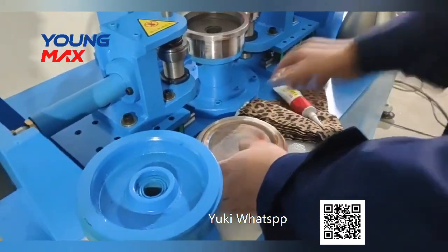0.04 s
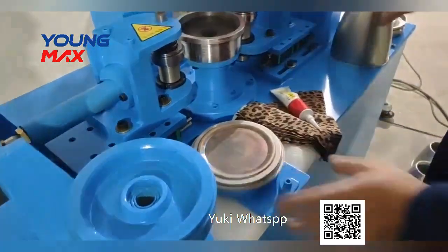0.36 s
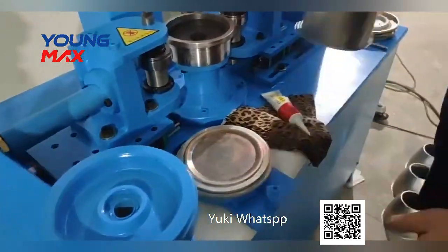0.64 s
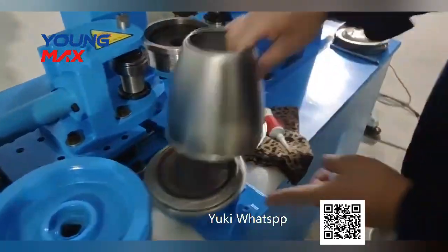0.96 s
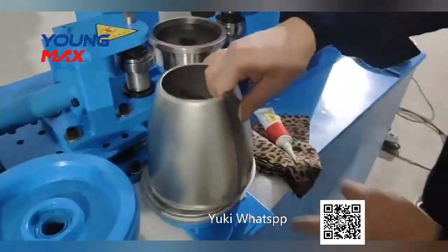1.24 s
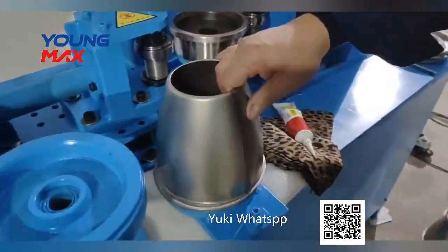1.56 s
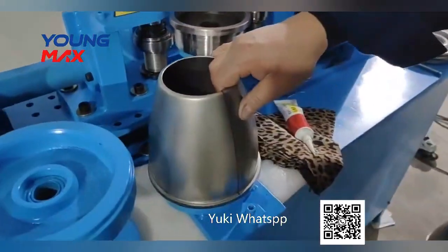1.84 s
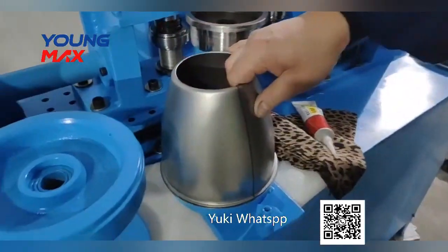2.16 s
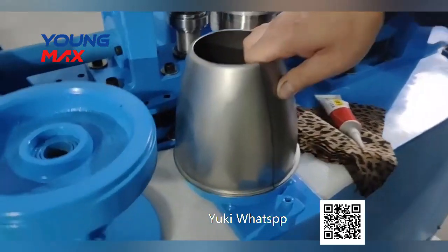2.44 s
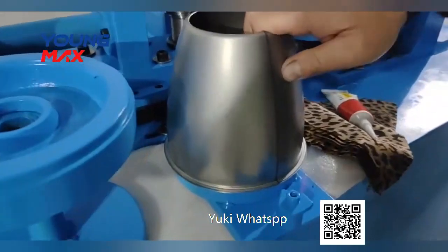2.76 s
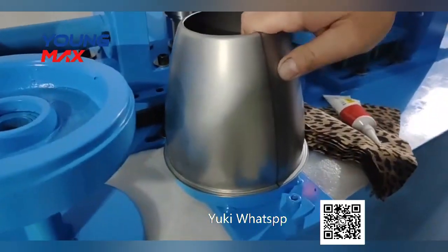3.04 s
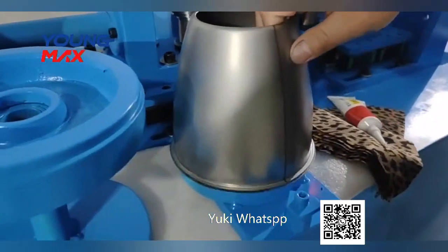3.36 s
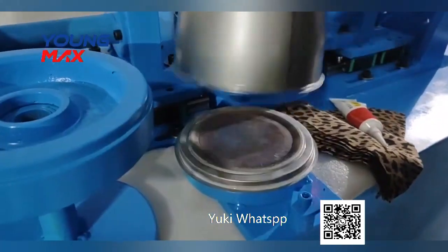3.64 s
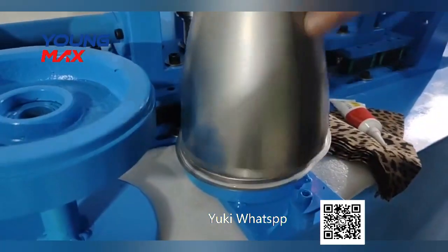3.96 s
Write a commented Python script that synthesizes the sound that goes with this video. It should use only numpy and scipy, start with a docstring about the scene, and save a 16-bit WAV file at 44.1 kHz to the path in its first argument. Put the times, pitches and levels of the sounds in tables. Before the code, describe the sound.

An idling machine motor hums, whirs and throbs in a workshop, growing slightly louder as the microphone moves closer. Handled steel parts knock and clack brightly near the start, then slide, tick and knock softly against a metal plate.

```python
"""A motor hums and throbs, its bearings whirring once per turn: a metalworking machine idling in a workshop.
A steel kettle body is picked from a stack with a ringing double clack, set on its base plate with a few
dull knocks and lifted off again; its thin rim slides and ticks. Shaft harmonics beat to make the throb,
and swell and fade over the fan's rush as the microphone drifts closer to the motor."""
import sys
import numpy as np
from scipy import signal
from scipy.fft import rfft, irfft
from scipy.io import wavfile

SR = 44100
rng = np.random.default_rng(int(sys.argv[2]) if len(sys.argv) > 2 else 0)


def digitize_waveform(pressure):
    """Quantize a signal to 16-bit integers and store it at the path in sys.argv[1].

    Rows of a 2-D input are taken as channels; values are limited to [-1, 1].
    """
    field = np.atleast_2d(pressure).T
    bounded = np.clip(field, -1, 1)
    quanta = np.round(bounded * 32767).astype(np.int16)
    wavfile.write(sys.argv[1], SR, quanta)


N = 176400
T = np.arange(N) / SR
SHAFT_HZ, CUTOFF_HZ = 24.823, 12100


def from_db(db):
    """Decibels to gain."""
    return 10 ** (np.asarray(db) / 20)


def in_time(rows):
    """Rows of (time_s, value), interpolated per sample."""
    return np.interp(T, *np.transpose(rows))


def at_hz(points, hz):
    """Spectrum level in dB, interpolated over log frequency."""
    points_hz, db = np.transpose(points)
    return np.interp(np.log(np.maximum(hz, 1)), np.log(points_hz), db)


def drift(rate_hz):
    """Random wander of spread 1, low-passed at rate_hz."""
    hop, settle = 100, 2000
    pole = np.exp(-2 * np.pi * rate_hz * hop / SR)
    noise = rng.standard_normal(N // hop + settle + 2)
    slow = signal.lfilter([1], [1, -2 * pole, pole * pole], noise)[settle:]
    return np.interp(np.arange(N) / hop, np.arange(len(slow)), (slow - slow.mean()) / slow.std())


def band_noise(low_hz, high_hz):
    """Band-passed noise, rms 1."""
    band = signal.butter(2, [low_hz, high_hz], "band", fs=SR, output="sos")
    noise = signal.sosfilt(band, rng.standard_normal(N))
    return noise / noise.std()


def highpass(x, hz):
    """Second-order low cut."""
    return signal.sosfilt(signal.butter(2, hz, "high", fs=SR, output="sos"), x)


def ring(clicks, hz, t60_s):
    """One mode: a unit click starts a decaying sine of height 1."""
    pole = np.exp(-np.log(1000) / (t60_s * SR))
    step_rad = 2 * np.pi * hz / SR
    return signal.lfilter([0, np.sin(step_rad)], [1, -2 * pole * np.cos(step_rad), pole ** 2],
                          clicks + 1e-18)


def clicks_at(times_s, gains):
    """Single-sample blows."""
    out = np.zeros(N)
    np.add.at(out, (np.atleast_1d(times_s) * SR).astype(int), gains)
    return out


def dying(start_s, decay_s):
    """Sudden start, exponential decay."""
    return (T >= start_s) * np.exp(-np.minimum(np.abs(T - start_s) / decay_s, 60))


def hum(turns, near_db):
    """Shaft harmonics and mains hum; the 25th and 26th harmonics beat into a throb."""
    # strong harmonics along the microphone's path: time_s, level_db
    hum_13 = [(0, -66), (.6, -62), (.9, -54), (1.15, -47), (1.7, -44), (2.1, -43), (2.6, -45.5), (3.1, -47),
              (3.5, -53), (4, -56)]
    hum_25 = [(0, -50), (.4, -48.5), (.8, -50), (1.3, -51), (1.7, -56), (2.2, -57), (2.5, -47),
              (2.9, -41.3), (3.3, -41.5), (4, -41.5)]
    hum_26 = [(0, -56), (.5, -61), (.8, -46), (1.2, -47), (2.1, -39.5), (2.6, -39.8), (3, -38.5),
              (3.4, -39.3), (4, -39.3)]
    hum_65 = [(0, -64), (1.8, -65), (2.5, -57), (3.2, -55.5), (4, -54.5)]
    # weaker tones and whines: shaft_multiple (rounded below), level_db, peak_s, fade_db_per_s
    whines = [(8, -54.5, 4.5, 3.5), (10, -56.5, 3.5, 5), (15, -56, -0.5, 4.5), (16, -55, 4.5, 5.5),
              (23, -59, 2.5, 5), (24, -46.5, -0.5, 11), (27, -53, -0.5, 8.5), (31, -67, 2, 2.5),
              (34, -57.5, 3.5, 2.5), (36, -52.5, 2, 5), (37, -59.5, 1, 3.5), (39, -53.5, 2.5, 4),
              (40, -60, 3, 4), (49, -59, 2.4, 3.5), (52, -62, 3.5, 3.5), (72.5, -60, 3, 4),
              (84.7, -55, 0.5, 6), (85.6, -58.5, 4, 3), (91, -60, 2, 3), (131.8, -58, 1.5, 10.5),
              (141.7, -58, 2, 15), (154, -52, 1.3, 12), (156.5, -67, 6, 12), (156, -57.5, 3.5, 2),
              (159, -54, 3.3, 5), (166, -59, 2, 8), (207, -64, 2.8, 1)]
    # electrical hum of the windings: pitch_hz, level_db, peak_s, fade_db_per_s
    mains = [(100.3, -56, 1.4, 0.5), (199.8, -52, 2.23, 5), (299.6, -48, 2.2, 4)]

    def tone(cycles, rms_db):
        return np.sqrt(2) * from_db(rms_db) * np.sin(2 * np.pi * cycles)

    def passing(cycles, level_db, peak_s, fade_db_per_s):
        """A tone loudest near one spot on the path."""
        place_db = 0.95 * near_db - fade_db_per_s * np.abs(T - peak_s)
        phase = rng.random()
        wander_db = 2.5 * drift(rate_hz=0.94)
        return tone(cycles + phase, level_db + place_db + wander_db)

    out = np.zeros(N)
    for multiple, curve in [(13, hum_13), (25, hum_25), (26, hum_26), (65, hum_65)]:
        out += tone(multiple * turns, in_time(curve) + 0.63 * drift(rate_hz=7.2))
    uneven_turns = turns + 0.0006 * drift(rate_hz=14)  # blurs the high whines
    out += sum(passing(np.round(multiple) * uneven_turns, *place) for multiple, *place in whines)
    return out + sum(passing(hz * T, *place) for hz, *place in mains)


def bearing_whir(turns, size=16384):
    """A rough track run over once per turn; its sound shifts with the listening position."""
    # whir spectrum: frequency_hz, density_db
    spectrum = [(400, -89), (800, -79.5), (1400, -109), (1900, -83.5), (2750, -95), (3300, -88),
                (4000, -86), (4600, -87.5), (5600, -83.5), (7000, -91.5), (7900, -78.5), (9500, -91),
                (12000, -84)]
    hz = np.arange(size // 2 + 1) * SHAFT_HZ
    in_band = (hz > 0) & (hz < CUTOFF_HZ)
    height = from_db(at_hz(spectrum, hz)) * np.sqrt(SHAFT_HZ) * size / 2 * in_band

    def track():
        one_turn = irfft(height * (rng.standard_normal(len(hz)) + 1j * rng.standard_normal(len(hz))))
        return np.interp(turns * size, np.arange(size), one_turn, period=size)

    crossfade_rad = np.pi / 2 * T / T[-1]
    return track() * np.cos(crossfade_rad) + track() * np.sin(crossfade_rad)


def fan_air():
    """Rush of the cooling fan over shop rumble, flickering slightly."""
    # air and rumble spectrum: frequency_hz, density_db
    spectrum = [(20, -92), (32, -81), (52, -69), (100, -69), (150, -71.5), (225, -72), (265, -75),
                (340, -70), (430, -77.5), (620, -74.5), (900, -81), (1150, -82.5), (1500, -82.5),
                (2000, -80), (2750, -86.5), (3500, -84), (3980, -82.5), (4500, -85.5), (5800, -87),
                (7000, -77), (7900, -79.5), (9500, -86), (10800, -91.5), (12000, -81.5)]
    hz = np.arange(N // 2 + 1) * SR / N
    height = from_db(at_hz(spectrum, hz)) * np.sqrt(SR / 2)
    rush = irfft(rfft(rng.standard_normal(N)) * height, N)
    flicker_db = 1.72 * drift(rate_hz=20.5)
    return rush * from_db(flicker_db)


def rim():
    """The thin rim slides in short grainy strokes and ticks when touched."""
    # metal sliding on metal: start_s, level_db, length_s, low_hz, high_hz
    slides = [(0, -38.5, 0.038, 566, 1110), (0, -42, 0.093, 1800, 5070), (0.022, -44.5, 0.099, 930, 1050),
              (0.724, -42, 0.12, 1100, 2980), (1.503, -50, 0.16, 1100, 2360), (1.49, -42, 0.067, 487, 920),
              (1.629, -46, 0.073, 650, 1040), (1.733, -44.5, 0.027, 800, 1080),
              (1.821, -43, .018, 900, 2400), (3.238, -43, 0.11, 1500, 10900),
              (3.934, -43, 0.052, 2800, 5700)]
    # light touches: start_s, level_db
    ticks = [(1.825, -39), (2.259, -41), (3.933, -30.5)]
    tick_envelope = sum(from_db(level_db) * dying(start_s, decay_s=0.016) for start_s, level_db in ticks)
    out = band_noise(7500, CUTOFF_HZ) * tick_envelope
    grain = from_db(1.9 * drift(rate_hz=89))
    for start_s, level_db, length_s, low_hz, high_hz in slides:
        progress = np.clip((T - start_s) / length_s, 0, 1)
        stroke = np.sin(np.pi * np.sqrt(progress))
        out += from_db(level_db) * stroke * grain * band_noise(low_hz, high_hz)
    return out


def knocks():
    """Each blow excites a damped low mode, a weak overtone and a noisy thud."""
    # parts on the die and table: start_s, level_db, pitch_hz, t60_s
    blows = [(0.253, -33.5, 434, 0.17), (0.2961, -21, 429.5, 0.14), (.345, -27.5, 422, 0.039),
             (1.492, -30, 740, 0.05), (1.534, -32, 626, 0.032), (2.934, -29, 393, 0.059),
             (3.245, -25, 353, 0.082), (3.9289, -20, 519, 0.055), (3.9352, -24, 483, 0.12),
             (3.947, -25, 545, 0.03), (3.976, -29, 129, 0.26), (3.977, -33, 628, 0.14),
             (3.987, -33, 976, 0.21)]
    out = np.zeros(N)
    for start_s, level_db, pitch_hz, t60_s in blows:
        blow = clicks_at(start_s, gains=0.99)
        thud = from_db(-12.5) * band_noise(pitch_hz / 2, pitch_hz * 1.15) * dying(start_s, decay_s=0.08)
        modes = ring(blow, pitch_hz, t60_s) + from_db(-24.5) * ring(blow, 3.2 * pitch_hz, t60_s)
        out += from_db(level_db) * highpass(modes + thud, pitch_hz / 2)
    return out


def clacks():
    """Each contact cracks, rings the steel body and leaves the stack clattering briefly."""
    # steel on steel: start_s, strength_db, tilt_db_per_octave
    contacts = [(.4144, 0, -1.5), (.418, -6, -1), (.4215, -5, 0), (.4355, -11, 5), (.458, .5, 1),
                (.466, -6, 2), (3.266, -18.5, 0), (3.939, -15, 5), (3.952, -18, 5), (3.976, -22, 7)]
    # kettle body modes: pitch_hz, level_db, t60_s
    modes = [(1065, -43.5, 0.05), (1287, -51, 0.93), (1596, -28.5, 0.043), (1780, -52, 0.19),
             (1870, -30, .06), (2114, -48, .4), (2250, -30.5, 0.066), (2444, -29.5, 0.078),
             (2490, -47, 0.39), (2640, -45, 0.063), (2883, -29.5, 0.059), (3050, -32, 0.095),
             (3030, -36.5, .38), (3160, -27.5, 0.074), (3150, -38, 0.053), (3290, -34, 0.064),
             (3480, -47, 0.049), (4020, -39.5, 0.091), (4330, -29, 0.11), (4830, -33, 0.12),
             (4680, -31.5, 0.17), (5020, -42, 0.1), (5160, -37, 0.16), (5586, -35, 0.073)]
    starts_s, strengths_db, tilts_db_per_octave = np.transpose(contacts)
    pivot_hz, scatter_db = 3200, 1
    ringing = np.zeros(N)
    for pitch_hz, level_db, t60_s in modes:
        tilts_db = tilts_db_per_octave * np.log2(pitch_hz / pivot_hz)
        drive_db = strengths_db + level_db + tilts_db + rng.normal(0, scatter_db, len(contacts))
        signs = rng.choice([-1, 1], len(contacts))
        ringing += ring(clicks_at(starts_s, signs * from_db(drive_db)), pitch_hz, t60_s)
    noise = band_noise(1450, 4150) + from_db(-5.5) * band_noise(7900, 11800)
    power = np.zeros(N)
    for start_s, strength_db, _ in contacts:
        crack = from_db(strength_db - 24) * dying(start_s, decay_s=0.0038)
        clatter = from_db(strength_db - 35.5) * dying(start_s, decay_s=0.057)
        power += (crack + clatter) ** 2
    return ringing + noise * np.sqrt(power)


def workshop(x, t60_s=1, gap_s=0.0093, lowpass_hz=4900):
    """Diffuse, slightly dull reverberation."""
    tail = rng.standard_normal(N) * np.exp(-np.log(1000) * T / t60_s) * (T > gap_s)
    tail /= np.sqrt(np.sum(tail ** 2))
    tail = signal.sosfilt(signal.butter(1, lowpass_hz, fs=SR, output="sos"), tail)
    return signal.fftconvolve(x, tail)[:N]


def scene():
    """Motor plus handled parts and their reverberation, the same in both channels."""
    # nearness to the motor: time_s, gain_db
    nearness = [(0, 0.5), (.6, 0), (1.05, -1), (1.5, -1), (2.1, 0), (2.7, 0.1), (3.3, 1.3), (4, 2)]
    near_db = in_time(nearness)
    speed_hz = SHAFT_HZ * (1 + 0.0004 * drift(rate_hz=1.78))
    turns = np.cumsum(speed_hz) / SR
    motor = hum(turns, near_db) + from_db(near_db) * (bearing_whir(turns) + fan_air())
    parts = clacks() + knocks() + rim()
    return np.tile(motor + parts + from_db(-7) * workshop(parts), (2, 1))


def record(dry):
    """Overall tone colour: rumble cut, a treble dip near 7 kHz, a steep top cut."""
    dip_hz, dip_width_hz, dip_depth = 6874, 1530, 0.89
    trimmed = highpass(dry, hz=22)
    notched = signal.lfilter(*signal.iirnotch(dip_hz, dip_hz / dip_width_hz, fs=SR), trimmed)
    coloured = trimmed + dip_depth * (notched - trimmed)
    return signal.sosfilt(signal.ellip(14, 0.2, 90, CUTOFF_HZ, fs=SR, output="sos"), coloured)


dry = scene()
out = record(dry)
digitize_waveform(out)
```